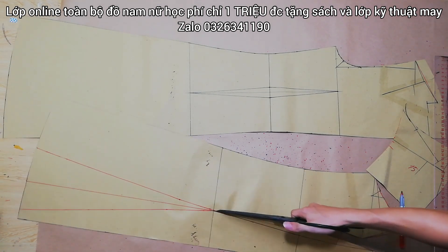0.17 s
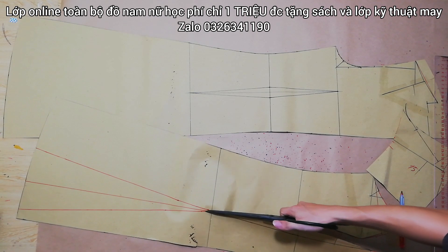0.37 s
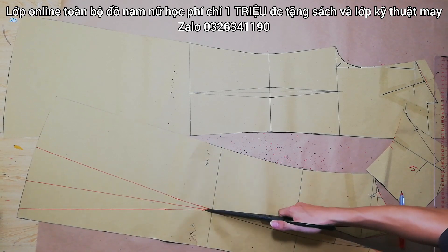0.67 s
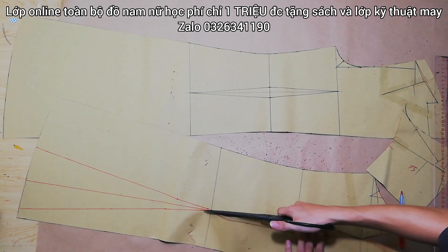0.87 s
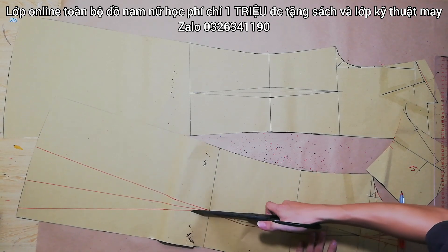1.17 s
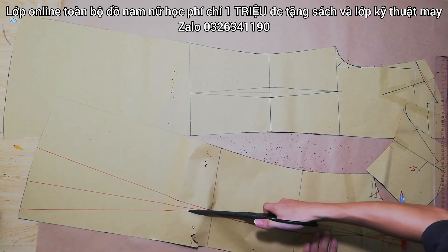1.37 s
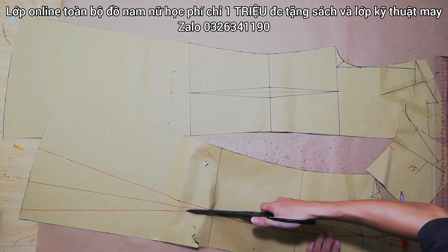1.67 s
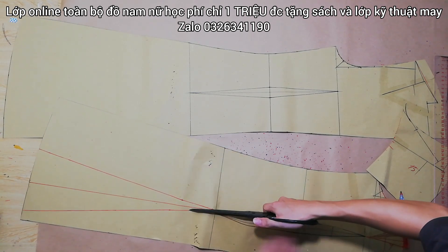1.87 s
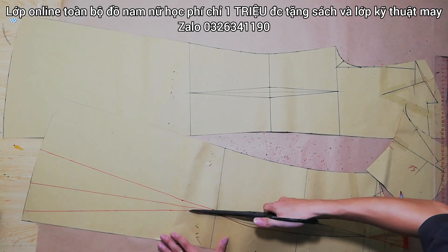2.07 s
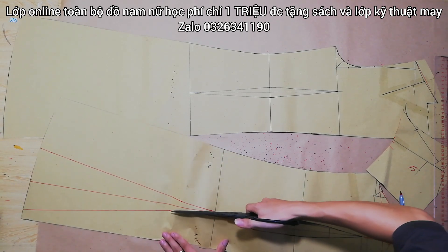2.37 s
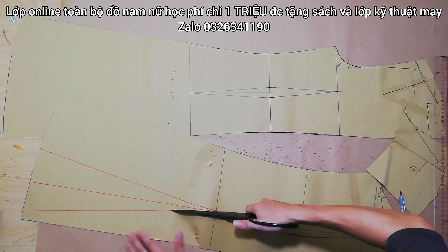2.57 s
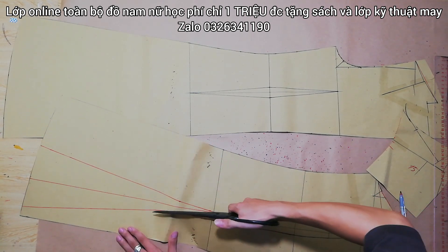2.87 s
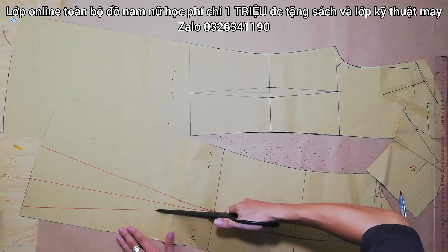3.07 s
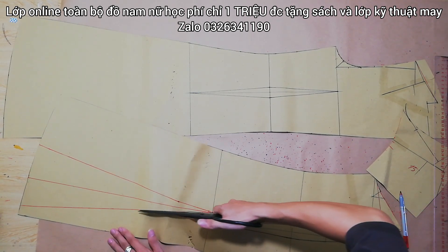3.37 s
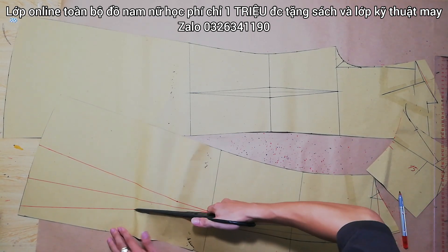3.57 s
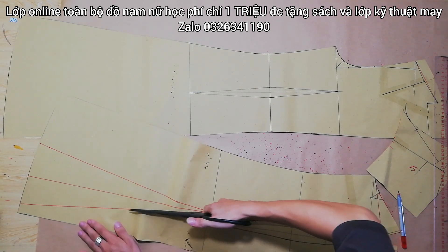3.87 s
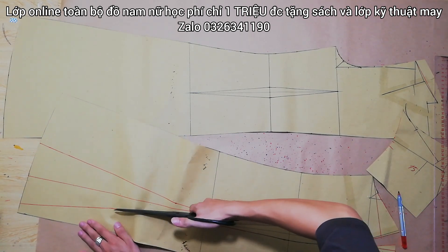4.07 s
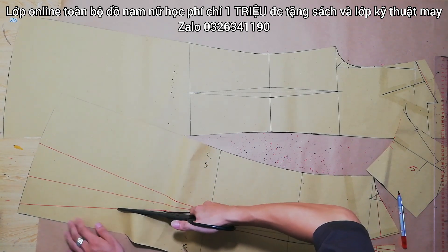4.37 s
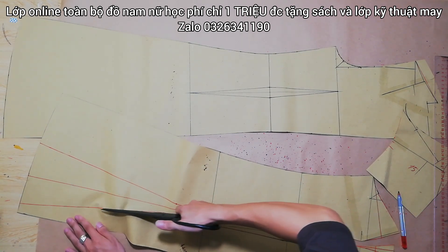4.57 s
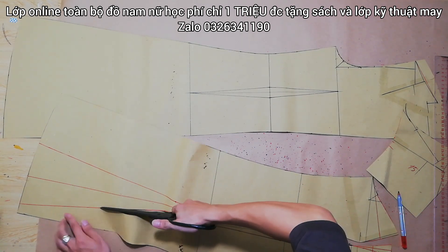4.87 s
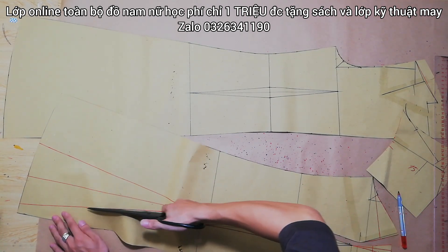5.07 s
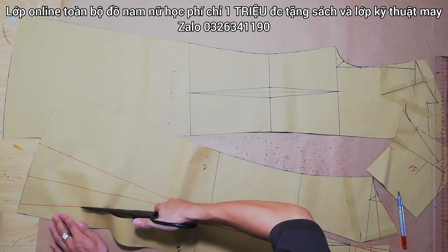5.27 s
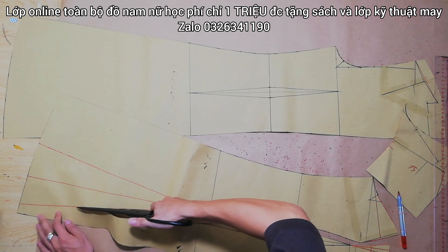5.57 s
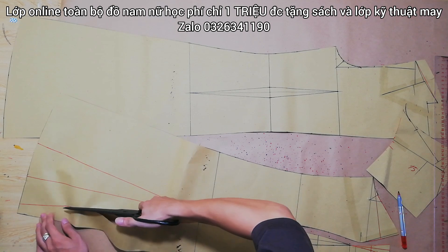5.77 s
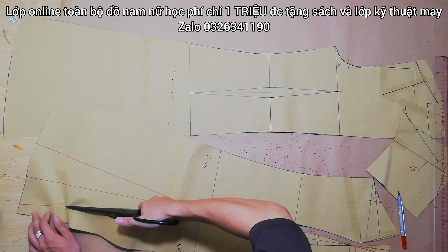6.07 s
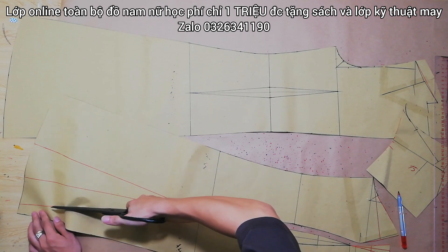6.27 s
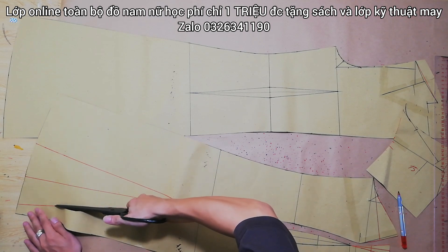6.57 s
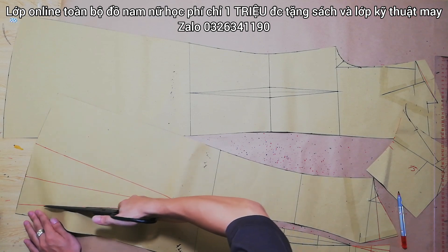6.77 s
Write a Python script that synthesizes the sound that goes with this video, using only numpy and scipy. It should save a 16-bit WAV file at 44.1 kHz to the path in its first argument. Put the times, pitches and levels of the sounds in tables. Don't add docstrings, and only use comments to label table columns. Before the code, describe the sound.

Slow, crisp scissor cuts through stiff paper with metallic blade ring and dull table thumps, paper sliding between them over faint low street rumble.

```python
import sys
import numpy as np
from scipy import signal
from scipy.fft import rfft, irfft, next_fast_len
from scipy.io import wavfile
from scipy.ndimage import uniform_filter1d, map_coordinates

SR = 44100
rng = np.random.default_rng(int(sys.argv[2]) if len(sys.argv) > 2 else 0)


def invert_db(level):
    return 10 ** (np.asarray(level, dtype=float) / 20)


def to_wav(sig):
    pcm = np.clip(np.atleast_2d(sig), -1, 1) * 32767
    pcm = np.round(pcm).astype(np.int16)
    wavfile.write(sys.argv[1], SR, pcm.T)


N = 305613

# [bite t/s, closing-in time/s, bite level/dB, follow-through level/dB, blade ring level/dB]
STROKES = [
    (0.592, .024, -33, -40, -5),
    (1.734, 0.041, -31, -41.5, 9.5),
    (2.528, 0.044, -30.5, -42, 4),
    (3.069, 0.031, -29.5, -41, 7),
    (3.645, 0.032, -33, -39, 8),
    (4.244, 0.043, -32.5, -39.5, 5),
    (4.821, 0.025, -29, -40, 5),
    (5.376, 0.063, -35, -43, 0),
    (5.923, 0.024, -33.5, -36, -6),
    (6.521, 0.038, -34.5, -46.5, -8),
]
# [chatter/dB, drumming/dB, deep boom/dB, bite to blade's landing/s]
JOLTS = [(-36.5, -42, -49.5, 0.037), (-37.5, -37, -53, 0.039), (-39, -46.5, -43.5, 0.052),
         (-39.5, -38.5, -40, 0.062), (-37, -36.5, -45.5, 0.056), (-35.5, -37, -44, 0.037),
         (-39.5, -38.5, -49, 0.055), (-37, -34, -44.5, 0.046), (-38, -37.5, -52, 0.05),
         (-35.5, -38, -54, 0.022)]
# [hardest pull t/s, speeding up/s, slowing down/s,
# rustle/dB, brightness/dB]
DRAGS = [(0.03, 0.22, 0.068, -57, 9), (0.131, 0.06, 0.4, -52, 0), (0.36, 0.18, 0.23, -55.5, 2.5),
         (0.811, .012, 0.13, -50.5, 6), (0.92, 0.096, 0.18, -38.5, -5), (1.074, 0.052, 0.11, -40.5, 2.5),
         (1.2, .1, 0.25, -52, 4.5), (1.591, 0.069, 0.12, -53.5, -2.5), (2.154, 0.03, 0.13, -48.5, -0.5),
         (2.329, 0.18, .15, -47.5, -1), (2.76, .05, 0.31, -58, 7.5), (2.89, 0.067, 0.09, -49.5, -0.5),
         (2.98, 0.043, 0.033, -46, -13.5), (3.36, 0.11, 0.24, -58.5, 5.5), (3.518, 0.11, 0.12, -47, -6),
         (4.038, 0.14, .18, -47, 1), (4.45, 0.04, 0.15, -64.5, 11.5), (4.72, 0.17, 0.072, -47.5, 3.5),
         (5.03, 0.023, 0.4, -58.5, 6), (5.27, 0.12, .07, -54.5, 0), (5.62, 0.064, 0.27, -57.5, 10),
         (5.82, 0.18, 0.082, -49.5, 5.5), (6.29, 0.11, 0.18, -49, 0), (6.78, 0.23, 0.73, -65, 6.5),
         (1.45, .1, 0.069, -63.5, 2.5), (0.096, .015, 0.045, -51, -13), (4.1, 0.11, 0.072, -58, 12.5),
         (1.63, .05, 0.058, -54, -9), (3.775, 0.055, 0.017, -57.5, 12.5), (3.899, 0.031, 0.062, -55.5, 6.5),
         (4.04, 0.057, 0.04, -49, 4), (5.0, 0.068, 0.024, -59.5, 11), (5.32, 0.014, 0.06, -45, -23),
         (6.199, 0.024, 0.049, -52.5, 5), (6.28, 0.07, 0.06, -51, 10.5), (6.46, 0.03, 0.033, -51.5, -0.5),
         (0.955, 0.022, 0.034, -40, -15), (0.9, 0.027, .05, -37, -0.5)]
MOVES = np.transpose(DRAGS)


def unit(x):
    return x / np.sqrt(np.mean(x ** 2) + 1e-20)


def along(points, hz):
    f, v = np.transpose(points)
    return np.interp(np.log(hz + 1), np.log(f + 1), v)


def curves(tables, silent):
    pause = 0.03
    rows = [(tables[0][0][0] - pause / 3, *silent)]
    following = [*tables[1:], [(np.inf,)]]
    for points, after in zip(tables, following):
        end, start = points[-1][0], after[0][0]
        rows += [*points]
        if start - end > pause:
            rows += [(end + pause / 3, *silent), (start - pause / 3, *silent)]
    s, *columns = np.transpose(sorted(rows[:-1]))
    return [np.interp(np.arange(N) / SR, s, c) for c in columns]


def wobble(rate):
    knots = rng.standard_normal(int(N * rate / SR) + 4)
    return map_coordinates(knots, [np.arange(N) * rate / SR])


def filtered(x, response):
    m = next_fast_len(N + SR // 2)
    return irfft(rfft(x, m) * response(np.fft.rfftfreq(m, 1 / SR)), m)[..., :N]


def coloured(x, spectrum):
    return unit(filtered(x, lambda hz: invert_db(along(spectrum, hz))))


def modes(resonances):
    def response(f):
        total = 0
        for k, (centre, width, db) in enumerate(resonances):
            ring = 1j * f * width / (centre * centre - f * f + 1j * f * width)
            total = total + (-1) ** k * invert_db(db) * ring
        return total
    return response


def fibres(rate, scatter_db, smooth):
    size_db = np.minimum(scatter_db * rng.exponential(size=N), 15)
    breaks = (rng.random(N) < rate / SR) * rng.standard_normal(N) * invert_db(size_db)
    rough = unit(breaks) + smooth * rng.standard_normal(N)
    strength = np.sqrt(np.abs(uniform_filter1d(rough ** 2, size=SR // 20)) + 1e-3)
    return rough / strength


def patchy(x, depth_db):
    z = signal.stft(x, nperseg=256)[2]
    field = uniform_filter1d(rng.standard_normal(z.shape), size=5, axis=0)
    field = uniform_filter1d(field, size=12, axis=1)
    return signal.istft(z * invert_db(depth_db * unit(field)), nperseg=256)[1][:N]


def wide(total, difference):
    # [f/Hz, level/dB]
    spread = [(60, -48), (110, -13.5), (200, -14.5), (380, -1.5), (700, 7), (1290, -10), (2380, -6),
              (4400, 3), (8120, 7), (15000, 0)]
    ahead = filtered(total, lambda hz: 1j * 0.43 * invert_db(along(spread, hz)))
    side = ahead + filtered(difference, lambda hz: 0.7 * invert_db(along(spread, hz)))
    return np.array([total + side, total - side])


def moments(s):
    return np.arange(0, N / SR + 1e-3, 1e-3) - np.reshape(s, (-1, 1))


def together(gains):
    total = np.sqrt(np.sum(gains ** 2, axis=0))
    return np.interp(np.arange(N) / SR, np.arange(len(total)) * 1e-3, total)


def swell(s, db, rise_s, hold_s, db_per_s, sudden=1):
    t, column = moments(s), lambda v: np.reshape(v, (-1, 1))
    attack = np.clip(1 + t / column(rise_s), 0, 1) ** sudden
    return attack * invert_db(column(db) - db_per_s * np.maximum(t - column(hold_s), 0))


def pulls(db):
    s, up_s, down_s = MOVES[:3, :, None]
    t = moments(s)
    speed = 1 - np.where(t < 0, np.abs(t / up_s) ** 2.08, np.abs(t / down_s) ** 2.06)
    return together(np.clip(speed, 0, 1) * invert_db(db)[:, None])


def background():
    # [f/Hz, level/dB per Hz]
    street = [(15, -34), (25, 12.5), (38, 15.5), (91, 5.5), (157, -17), (217, 2), (361, -8.5), (462, -9.5),
              (565, -75), (746, -13), (1000, -11), (1300, -11), (2200, -120)]
    # [f/Hz, level/dB per Hz]
    hiss = [(350, -16), (600, -5), (1400, -3), (3000, 0.5), (6000, -4.5), (11000, -2), (14000, -14),
            (15800, -20)]
    # [t/s, f/Hz, level/dB]
    drone_path = [
        [(0.0, 224, -66), (0.038, 203, -69.5), (0.116, 205, -61), (0.18, 222, -66), (0.306, 184.2, -57.5),
         (0.352, 188.3, -53), (0.382, 183, -63), (0.56, 173.5, -63)],
        [(1.3, 214.6, -75), (1.356, 215.4, -61), (1.444, 218, -55), (1.582, 218, -68), (1.67, 218, -63),
         (1.7, 199, -69)],
    ]
    rumble = wide(*coloured(rng.standard_normal((2, N)), street))
    rumble = invert_db(-62 + 1.6 * wobble(5.3)) * rumble
    hz, drone_db = curves(drone_path, silent=(205, -95))
    turn = 2 * np.pi * np.cumsum(hz + 3 * wobble(32.0)) / SR
    drone = np.sqrt(2) * invert_db(drone_db) * (np.sin(turn) + invert_db(-22.0) * np.sin(2 * turn))
    return rumble + drone + invert_db(-59) * coloured(rng.standard_normal((2, N)), hiss)


def walls(x):
    # [f/Hz, time/s]
    fading = [(200, 0.15), (1000, 0.12), (4000, 0.096), (12000, 0.092)]
    late = np.pad(x, (260, 0))[:N]
    hz, t, z = signal.stft(late, SR, nperseg=512, noverlap=384)
    keep = invert_db(-120 * (t[1] - t[0]) / along(fading, hz))
    energy = np.array([signal.lfilter([1 - k], [1, -k], row) for k, row in zip(keep, np.abs(z) ** 2)])
    diffuse = signal.stft(rng.standard_normal((2, N)), SR, nperseg=512, noverlap=384)[2]
    answer = np.sqrt(energy) * diffuse / np.abs(diffuse).std()
    return signal.istft(answer, SR, nperseg=512, noverlap=384)[1][:, :N]


def at_ports(x):
    # [t/s, lead/s]
    earlier = [(0, 0), (1, -.0001), (2, .00005), (6.93, .0002)]
    lead = np.interp(np.arange(N) / SR, *np.transpose(earlier)) * SR / 2
    direct = np.array([map_coordinates(v, [np.arange(N) + way * lead]) for v, way in zip(x, (1, -1))])
    bounce = np.array([np.roll(direct[0], 74), np.roll(direct[1], 84)])
    return direct + 0.36 * bounce


def shaking():
    # [t/s, drumming/dB, deep boom/dB]
    nudges = [(0.79, -82, -63), (2.18, -75, -53), (2.492, -43, -70), (2.915, -51, -74), (3.33, -69, -55),
              (3.599, -59, -63), (4.529, -69, -47.5), (4.78, -59, -51.5), (5.1, -57.5, -74),
              (5.55, -72, -82), (5.8, -83, -75)]
    # [chatter/dB, drumming/dB, boom/dB]
    rest_db = (-81, -69.5, -66.5)
    # [chatter/dB, drumming/dB, boom/dB]
    drag_db = (-22, -32, -31)
    s, close_s = np.transpose(STROKES)[:2]
    early_s = 0.2 * close_s
    chatter_db, drum_db, boom_db, land_s = np.transpose(JOLTS)
    at, nudge_db, deep_db = np.transpose(nudges)

    def nudge(db):
        return together(swell(at, db, rise_s=0.03, hold_s=0, db_per_s=191))

    chatter = together(swell(s - early_s, chatter_db, close_s - early_s, land_s + early_s, db_per_s=126))
    drum = together(swell(s + land_s, drum_db, rise_s=0.082, hold_s=0, db_per_s=110)) + nudge(nudge_db)
    boom = together(swell(s + land_s, boom_db, rise_s=0.069, hold_s=0, db_per_s=91)) + nudge(deep_db)
    dragged = pulls(MOVES[3])
    levels = zip((chatter, drum, boom), rest_db, drag_db)
    return [v + invert_db(rest) + invert_db(drag) * dragged for v, rest, drag in levels]


def table_top():
    # [f/Hz, width/Hz, level/dB]
    board_modes = [(403.4, 9.7, 6.5), (467.5, 21, 8), (541, 22, 5), (606.6, 20, 6), (742.4, 33, 4.5),
                   (811, 65, 5), (891.3, 20, 6.5), (1024, 46, -0.5), (1265, 360, -8)]
    drum_modes = [(145, 24, -4), (218, 16, 3), (288.3, 7.1, -0.5), (330.6, 28.3, -7.5)]
    boom_modes = [(60, 41, -14), (92.2, 12.7, 11.5)]
    # [chatter/dB, drumming/dB, boom/dB]
    knock_db = (18, 27.5, 30.5)
    chatter, drum, boom = shaking()
    landings = np.round((np.transpose(STROKES)[0] + np.transpose(JOLTS)[3]) * SR).astype(int)
    layers = [(invert_db(-5.0) * chatter, modes(board_modes), 300),
              (invert_db(-2) * drum, modes(drum_modes), 120),
              (boom, modes(boom_modes), 60)]
    sound = 0
    for (level, body, rate), blow_db in zip(layers, knock_db):
        jolts = np.array([fibres(rate, scatter_db=0, smooth=0.82), fibres(rate, scatter_db=1.0, smooth=0.29)])
        loudness = np.sqrt(np.mean(filtered(jolts[0], body) ** 2))
        jolts[0, landings] += invert_db(blow_db)
        sound = sound + wide(*filtered(level * jolts, body)) / loudness
    return sound


def creases(events, click_s, rattle):
    t = np.arange(SR // 40) / SR
    shape = invert_db(-60 * t / click_s) + rattle * invert_db(-60 * t / 0.02)
    sound = np.zeros((2, N + SR))
    for s, db, hz, pan_db in events:
        spread = 1.63 + 0.56 * invert_db(db + 9.5)
        edges = [hz / spread, min(hz * spread, 11000)]
        band = signal.butter(2, edges, "bandpass", fs=SR, output="sos")
        crack = rng.standard_normal(len(t))
        crack[0] = 3
        snap = signal.sosfilt(band, signal.sosfilt(band, shape * crack))
        spot = invert_db(np.array([[0.5], [-0.5]]) * pan_db)
        start = round(s * SR)
        sound[:, start:start + len(t)] += spot * invert_db(db + 5.5) * snap / np.abs(snap).max()
    return sound[:, :N]


def crackling():
    # [t/s, peak level/dB, centre f/Hz, left minus right/dB]
    snaps = [(0.1386, -46, 5630, 0.0), (0.3654, -35, 4830, 7), (0.8044, -32, 6700, -11),
             (1.0735, -9.5, 5200, 3.5), (1.325, -31, 5690, 0.0), (2.1006, -47, 7660, 8),
             (2.143, -34, 3450, 0), (2.2244, -35, 5590, -0.5), (2.2394, -30, 6500, -3),
             (2.2784, -43, 5630, -5.5), (2.3266, -35, 7660, -10), (2.369, -33, 6750, -5),
             (2.4477, -41, 3720, -0.5), (2.7038, -41, 8230, -5), (2.745, -30.5, 8000, 2),
             (2.9103, -29, 8200, 3), (2.9557, -38, 5890, 0.0), (3.0535, -50, 3600, -3),
             (3.9704, -44, 5320, 1.0), (4.436, -34, 8600, 1.5), (4.484, -39, 5370, 9),
             (5.0253, -37, 7322, -3), (5.2984, -28, 6000, 10), (5.448, -33, 5200, -9),
             (5.5964, -45, 4100, 11), (6.416, -33.5, 3755, 1), (6.7466, -40, 6260, 8)]
    flaps = [(1.7355, -24, 2500, 4), (0.954, -24, 2620, -1), (2.1635, -41, 1460, -1),
             (2.4851, -46, 1380, 1.5), (2.5042, -35.5, 1510, 2), (2.8726, -34, 3350, -1),
             (3.0612, -27, 2720, -0.5), (3.5137, -29.5, 2480, -4), (4.225, -37.5, 1160, 2),
             (4.759, -32, 2030, -1.0), (5.2982, -31, 2090, 6)]
    return creases(snaps, click_s=0.0032, rattle=0.42) + creases(flaps, click_s=0.0046, rattle=0.9)


def sliding():
    # [f/Hz, level/dB per Hz]
    rustle = [(240, -26), (400, -7), (536, -78), (654, -13), (1050, -12.5), (1210, -4), (1640, -2.5),
              (1980, 1), (2130, -1), (2770, 1), (10400, 3), (15700, -16.5)]
    rustle_db, bright_db = MOVES[3:]
    rub = coloured(patchy(fibres(900, scatter_db=-1.0, smooth=1.9), depth_db=0.9), rustle)
    low = filtered(rub, lambda hz: 1 / (1 + (hz / 4500) ** 4))
    high = unit(rub - low)
    uneven = invert_db(1.2 * np.array([wobble(70), wobble(70)]))
    return uneven[0] * pulls(rustle_db) * unit(low) + uneven[1] * pulls(rustle_db + bright_db) * high


def shearing():
    # [f/Hz, level/dB per Hz]
    shear = [(530, -77), (900, -4.5), (1320, -8.5), (1420, -4), (3010, -3), (3480, 2.5), (3780, -5.5),
             (4870, -4.5), (6330, -7), (11500, -9), (15700, -34.5)]
    # [f/Hz, width/Hz, level/dB]
    blades = [(2780, 320, 8), (3520, 140, 4), (3800, 32, -22), (1810, 201, 14.5)]
    # [t/s, level/dB]
    tip_path = [
        (6.505, -58),
        (6.517, -45),
        (6.58, -46),
        (6.6, -54),
        (6.66, -64),
    ]
    s, close_s, bite_db, follow_db, ring_db = np.transpose(STROKES)
    bite = swell(s, bite_db, close_s, hold_s=0.0013, db_per_s=526, sudden=1.94)
    follow = swell(s, follow_db, close_s, hold_s=0.06, db_per_s=157, sudden=1.94)
    cut = fibres(1800, scatter_db=3.5, smooth=0.55) * invert_db(1.3 * wobble(160))
    tearing = together(bite + follow) * coloured(patchy(cut, depth_db=2.5), shear)
    ring = together((bite + 0.71 * follow) * invert_db(ring_db - 11.5)[:, None])
    steel = unit(filtered(cut, modes(blades)))
    (tip_db,) = curves([tip_path], silent=(-90,))
    slips = cut * (1 + 0.9 * np.cos(2 * np.pi * 44 * (np.arange(N) / SR - 6.527)))
    tips = unit(filtered(slips, modes([(3270, 80, 0)])))
    return invert_db(0.18) * (tearing + ring * steel) + invert_db(tip_db) * tips


def scene():
    paper = shearing() + sliding()
    snaps = crackling()
    room = invert_db(-6) * walls(paper + 0.24 * snaps.mean(axis=0))
    return at_ports(invert_db(-6.5) * paper + snaps) + room + table_top() + background()


def low_pass(x):
    return signal.sosfilt(signal.butter(12, 15870, fs=SR, output="sos"), x)


def record(dry):
    # [f/Hz, level/dB]
    ports = [(60, 1.5), (110, -1), (200, 1.5), (380, -2), (700, 2), (1290, -0.5), (2380, 1.5), (4400, 1),
             (8120, 1.5), (15000, -13)]

    def response(hz):
        band = (hz < 15850) * hz ** 4 / (hz ** 4 + 33 ** 4)
        return band * invert_db(np.outer([0.5, -0.5], along(ports, hz)))

    return low_pass(filtered(dry, response))


dry = scene()
out = record(dry)
to_wav(out)
```